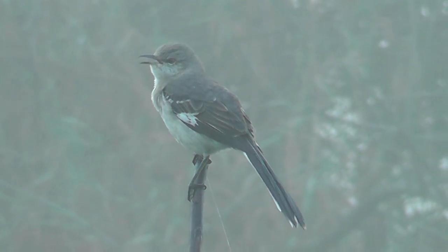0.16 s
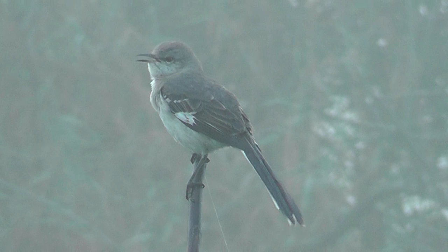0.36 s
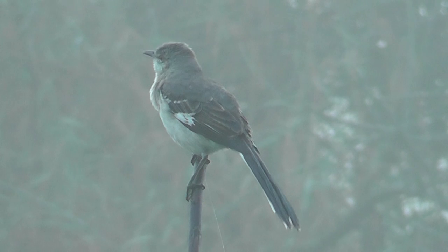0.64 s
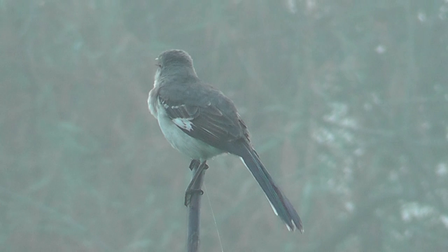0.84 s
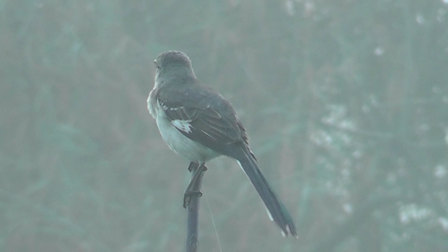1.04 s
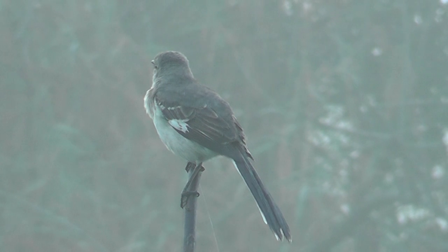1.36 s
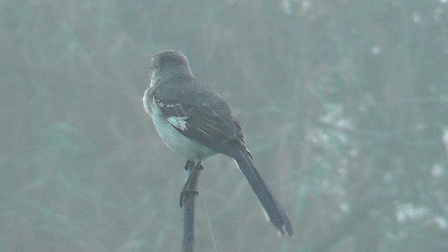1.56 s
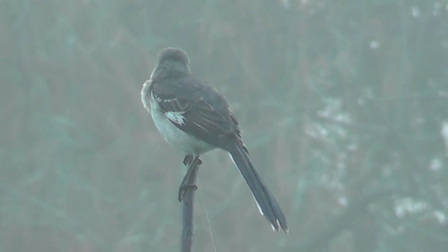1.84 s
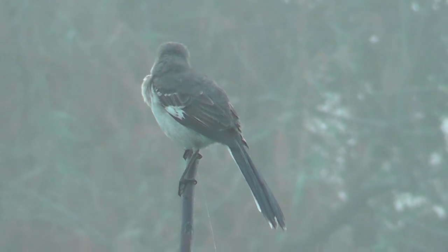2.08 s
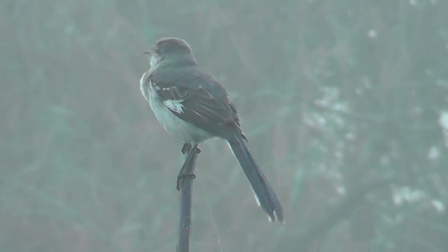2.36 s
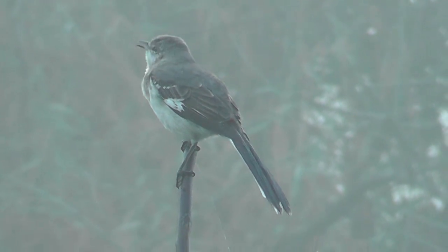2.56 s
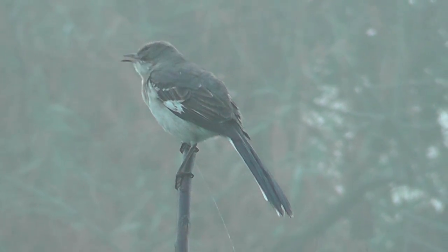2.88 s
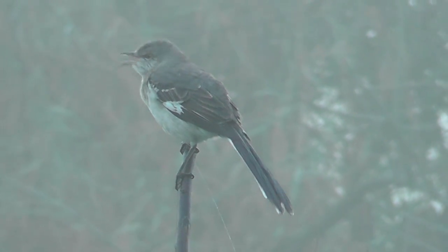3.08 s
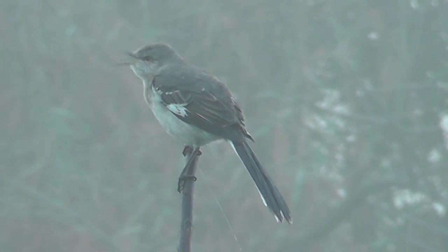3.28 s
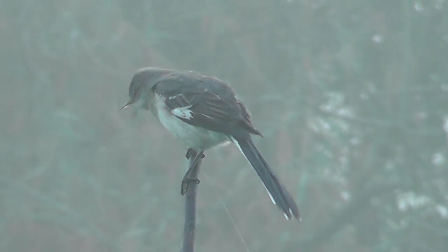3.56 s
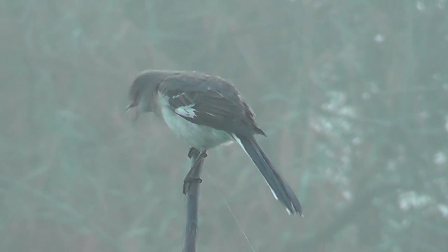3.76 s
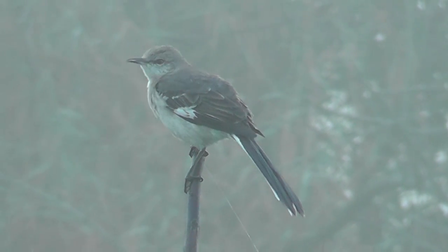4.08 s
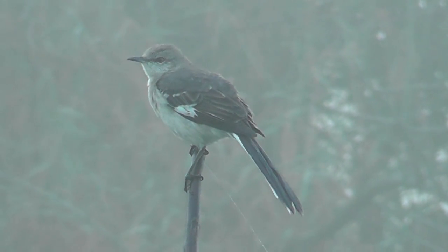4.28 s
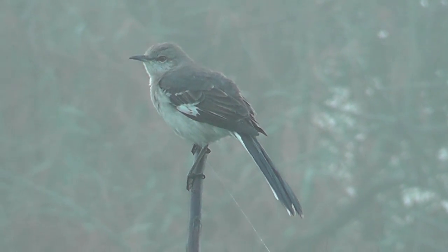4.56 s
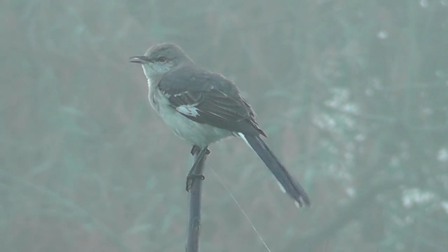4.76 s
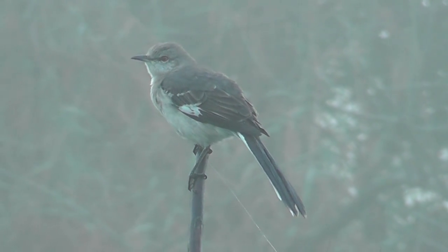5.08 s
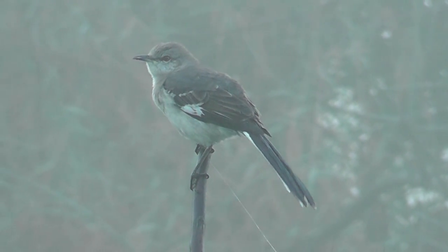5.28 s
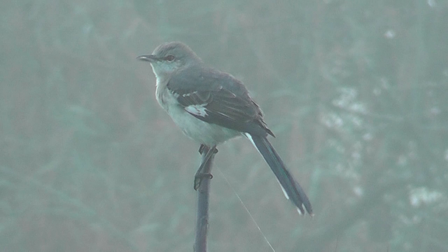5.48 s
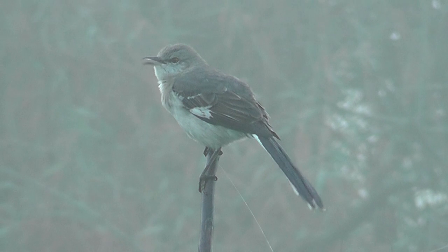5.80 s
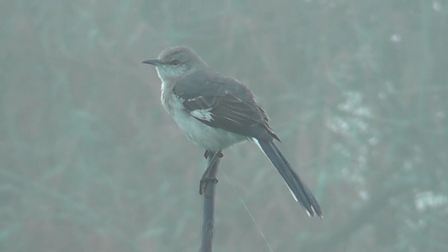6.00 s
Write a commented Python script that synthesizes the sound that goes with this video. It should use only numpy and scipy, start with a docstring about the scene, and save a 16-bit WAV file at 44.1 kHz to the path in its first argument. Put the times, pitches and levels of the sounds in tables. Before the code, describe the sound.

Varied bird whistles and falling slides give way to four raspy calls outdoors, with steady insects and a far traffic rush behind.

```python
"""A songbird on a twig whistles glides and warbles, then gives harsh two-voiced chucks. One side of its
voice box makes the whistles; both sides sound together in the chucks. Other birds answer with nasal
mews, sharp chips, thin whistles and far hoarse chirps. A cricket trills with its wings over an insect
chorus and the steady rush of distant traffic. Leaves scatter every bird call, and a camera's limiter
holds down the loudest peaks."""
import sys
import numpy as np
from scipy import signal
from scipy.fft import rfft, irfft, next_fast_len
from scipy.io import wavfile
from scipy.ndimage import uniform_filter1d, minimum_filter1d, map_coordinates

SR = 44100
rng = np.random.default_rng(int(sys.argv[2]) if len(sys.argv) > 2 else 0)


def wav_out(sig):
    """Save sig, one row per channel (or a flat mono array), as 16-bit PCM at SR to the path in sys.argv[1]."""
    wavfile.write(sys.argv[1], SR, np.round(np.clip(np.atleast_2d(sig).T, -1, 1) * 32767).astype(np.int16))


N = 270774

# A held whistle and two falling warbles. Overtones lie at 2 and 3 times the pitch:
# (second overtone [dB], third overtone [dB], rows of (time [s], pitch [Hz], level [dB]))
WHISTLE_PHRASES = [ (-19, -35, [(0.136, 2200, -42), (0.14, 2440, -32), (0.147, 4000, -36),
                   (0.155, 3300, -30), (0.175, 3500, -27.5), (0.2, 3746, -22), (0.25, 3605, -25),
                   (0.28, 3785, -28.5), (0.304, 3500, -40)]), (-17, -29, [(0.452, 3290, -35),
                   (0.465, 3540, -18.5), (0.49, 2270, -24), (0.504, 3060, -19), (0.517, 2510, -30),
                   (0.529, 2785, -22.5), (0.545, 2390, -29.5), (0.558, 2385, -38)]),
                   (-15.5, -34.5, [(0.904, 3530.0, -39), (0.912, 3900, -29), (0.927, 3850, -24),
                   (0.958, 2940, -19), (0.97, 3354, -23), (0.982, 2680, -25.5), (1.003, 2215, -27.5),
                   (1.019, 2600.0, -35.5), (1.05, 2190, -25), (1.081, 1974, -39.5), (1.108, 2200, -37)]), ]
# Downward slides, steepest after a bend: (start [s], bend [s], end [s], start pitch [Hz], bend pitch [Hz],
# end pitch [Hz], level [dB], change at the end [dB], second overtone [dB], third overtone [dB])
SLIDES = [(1.663, 1.68, 1.735, 4700, 4200, 2400, -23, -27, -22, -48),
          (2.503, 2.518, 2.562, 4800, 4470, 2740, -19, -14, -17.5, -48),
          (3.098, 3.126, 3.167, 4900, 4400, 3120, -27, -20, -11, -26)]
# Arched notes after a slide: (start [s], length [s], from [Hz], top [Hz], to [Hz], level [dB])
HOOKS = [(1.743, 0.062, 2490, 2550, 2180, -26.5), (2.602, 0.048, 2050, 2643, 2140, -25)]
# Harsh calls; the lower voice joins at the snap: (snap [s], run-up [s], hold [s], release [s], sag [s],
# upper from [Hz], upper to [Hz], lower enters [Hz], lower settles [Hz], lower to [Hz], quiver size [Hz],
# quiver period [s], quiver decay [s], level [dB], roughness [factor])
CHUCKS = [(4.86, 0.00092, 0.025, 0.029, 0.039, 4190, 3270, 3894, 3133, 2630, 1010, 0.0095, 0.0098, -25.5, 1),
          (5.319, .003, 0.035, 0.016, .042, 4050, 2960, 3800, 3315, 2730, 1000, .0113, 0.033, -22.5, 0.79),
          (5.638, 0.00101, 0.027, 0.029, .064, 3930, 2670, 2060, 3174, 1990, 550, 0.00985, 0.011, -21, 0.68),
          (5.901, .016, 0.046, 0.012, 0.063, 4220, 2590, 2800, 3013, 2245, 887, 0.018, 0.0094, -21, 0.45)]
# How the beak colours the harsh part of a chuck: (frequency [Hz], gain [dB])
BEAK = [(400, -90), (1800, -34), (3000, 11.0), (5500, 5.5), (8000, 2.5), (11500, -14.0), (13500, -15)]
# Nasal calls: (start [s], scoop ends [s], top [s], end [s], lower voice at top [Hz],
# upper voice at top [Hz], droop [factor], level [dB])
MEWS = [(0.304, 0.37, .49, 0.56, 2750, 4410, 0.96, -46),
        (1.848, 1.94, 2.056, 2.108, 2730, 4430, 1.4, -45.5),
        (3.586, 3.635, 3.77, 3.855, 2680, 4300, 1.05, -46),
        (5.037, 5.075, 5.3, 5.32, 2774, 4440, .1, -46.5)]
# Start and end of a mew's opening scoop: (lower voice [Hz], upper voice [Hz], level change [dB])
MEW_SCOOP = [(2423, 3930, -7), (2607, 4240, -2)]
# Tones mixed from a mew's two pitches: (lower pitch [multiple], upper pitch [multiple])
MEW_TONES = [(1, 0), (-2, 2), (0, 1), (2, 0), (-1, 2), (1, 1), (3, 0)]
# Strength of each of those tones through the mew: (start [dB], middle [dB], end [dB])
MEW_TONE_LEVELS = [(-4, -1, -3), (-10, -12.5, -11), (-6.5, -5, -5), (-5, 0, 3), (4.5, -3, -2),
                   (-14, -17, -16), (-13, -17, -20)]
# Sharp chips: (time [s], level [dB], pitch near the top [Hz])
CHIPS = [(0.839, -31, 5650), (1.5125, -32.5, 5350), (1.757, -28, 5540), (2.6204, -26, 5600),
         (2.9713, -30, 5600), (3.229, -19, 6210), (4.0685, -23.5, 5520), (5.5243, -26.5, 5660)]
# Thin whistles: (start [s], end [s], from [Hz], to [Hz], level [dB])
THIN_WHISTLES = [(0.795, 0.845, 5200, 5170, -49.5), (.815, 1.06, 5930, 5980, -46.5),
                 (0.83, 0.916, 7650, 7680, -52)]
# Far hoarse chirps: (start [s], level [dB])
FAR_CHIRPS = [(0, -46.5), (0.289, -43.5), (0.705, -46), (1.329, -48.5), (2.08, -47), (2.455, -44),
              (3.17, -47), (3.433, -45), (3.734, -49.5), (3.949, -50.5), (4.093, -48), (4.409, -46),
              (4.805, -48), (6.111, -45.5)]
# Echo from the leaves: (frequency [Hz], time to fade by 60 dB [s])
LEAF_DECAY = [(2000, 0.23), (4500, 0.15), (9000, 0.21)]
# Rush of distant traffic: (frequency [Hz], relative level [dB])
TRAFFIC_SPECTRUM = [(59, -85), (100, -60.5), (290, -21), (346, -10.5), (460, -8.5), (647, -0.5),
                    (1530, -15.5), (1800, -21.5), (2600, -22), (3380, -24.5), (5720, -120)]
# Insect chorus and hiss: (frequency [Hz], relative level [dB])
INSECT_SPECTRUM = [(1500, -35), (2200, -11), (2700, -51), (3700, -15), (4600, -16.5), (5450, -19.5),
                   (6050, -8.5), (6650, -5), (6950, -13.5), (7250, -20.5), (10000, -24.5), (13500, -23),
                   (16000, -27)]
# How alike the background noise is on both sides: (frequency [Hz], likeness [0 to 1])
STEREO_LIKENESS = [(300, 0.76), (700, 0.89), (1400, 0.11), (3000, 0.76), (6600, 1), (8000, 0.68),
                   (15000, 0.28)]
# How the songbird reaches the two microphones: (frequency [Hz], left over right [dB], left lead [rad])
SINGER_STEREO = [(2200, 1.5, -0.13), (2420, -1, -0.53), (3500, -3.5, 0.48), (4500, 2, 0.15),
                 (5600, -0.5, 0.2)]
# How the background reaches them: (frequency [Hz], left over right [dB], left lead [rad])
BACKGROUND_STEREO = [(256, -6, 0.24), (464, -3, 0.84), (1100, 2, 0.77), (2200, 0.6, 0.14)]


def whistles():
    """One side of the voice box makes a near-pure tone; the windpipe passes overtones above about 6 kHz."""
    pure, bright = np.zeros(N), np.zeros(N)
    for second_db, third_db, rows in WHISTLE_PHRASES + [trill_note(), *slide_notes(), *hook_notes()]:
        start, edge, (hz, db) = call_curves(rows)
        t = (start + np.arange(len(hz))) / SR
        hoarse_start = (t > .146) & (t < .172)
        angle = phase(hz, rough=np.where(hoarse_start, .055, .006))
        loudness = edge * amp(db + 0.84 * wobble(135, len(hz)))
        add(pure, start, loudness * np.sin(angle))
        glide_hz_per_s = np.abs(np.gradient(hz)) * SR
        rasp = .1 + .45 * np.clip(glide_hz_per_s / 40000, 0, 1)  # fast glides turn raspy
        overtones = amp(second_db) * np.sin(2 * angle)
        overtones += amp(third_db) * (np.sin(3 * angle) + 0.28 * np.sin(4 * angle))
        flutter = amp(1.7 * wobble(235, len(hz))) + rasp * wobble(1800, len(hz))
        add(bright, start, loudness * overtones * flutter)
    return pure + filtered(bright, lambda hz: 1 / (1 + (6300 / (hz + 1)) ** 12))


def trill_note():
    """Four fading swings between a quiet high note and a louder low note that sinks."""
    start_s, beat_s, high_hz, low_hz = .571, .0325, 2640, 2255
    second_db, third_db = -32, -43
    beats = np.arange(9) / 2
    is_high = beats % 1 == 0
    hz = np.where(is_high, high_hz, low_hz - 51.3 * beats)
    db = -27 - 11.5 * is_high - 2 * beats
    return second_db, third_db, np.c_[start_s + beats * beat_s, hz, db]


def slide_notes():
    """Each slide swells, drops steeply in pitch while loud, then trails off."""
    for start, bend, end, from_hz, bend_hz, to_hz, db, end_db, second_db, third_db in SLIDES:
        steep_s, steep_hz = .55 * (end - bend), .7 * (to_hz - bend_hz)
        yield second_db, third_db, [
            (start, from_hz, db - 20), (bend, bend_hz, db - 3),
            (bend + .2 * steep_s, bend_hz + .2 * steep_hz, db),
            (bend + steep_s, bend_hz + steep_hz, db), (end, to_hz, db + end_db)]


def hook_notes():
    """Each hook rises and falls, loudest at its top."""
    second_db, third_db, ends_db = -30, -26, -14.5
    for start, length, from_hz, top_hz, to_hz, db in HOOKS:
        yield second_db, third_db, [(start, from_hz, db + ends_db), (start + .335 * length, top_hz, db),
                                    (start + length, to_hz, db + ends_db)]


def chucks():
    """Both sides of the voice box sound; their shared airflow adds extra tones and a fading rasp."""
    voices, harsh = np.zeros(N), np.zeros(N)
    for *shape, roughness in CHUCKS:
        start, edge, (upper_hz, lower_hz, db, joined) = call_curves(chuck_shape(*shape))
        size = len(db)
        upper = np.sin(phase(upper_hz, rough=.032 * roughness))
        lower = joined * np.sin(phase(lower_hz, rough=.032 * roughness))
        flow = upper + 0.47 * lower
        air_fade = joined * amp(-300 * np.cumsum(joined) / SR)
        rasp = .9 * roughness * (1 + 0.82 * flow) * rng.standard_normal(size) * air_fade
        loudness = edge * amp(db + 1.5 * wobble(300, size))
        add(voices, start, loudness * (upper + amp(-5.5 + 2.5 * wobble(150, size)) * lower))
        add(harsh, start, edge * amp(db) * (0.23 * flow ** 2 + .12 * flow ** 3 + rasp))
    return voices + filtered(harsh, lambda hz: amp(look_up(BEAK, hz)))


def chuck_shape(snap, run_up, hold, release, sag_s, from_hz, to_hz, enter_hz, settle_hz, lower_end_hz,
                quiver_hz, period_s, decay_s, level_db):
    """The upper voice runs up alone; the lower joins, then both sag while a quick quiver dies away."""
    t = np.linspace(-run_up, hold + release, num=80)
    after = np.clip(t, 0, None)
    sag = np.sin(np.pi / 2 * np.clip(after / sag_s, 0, 1)) ** 2
    quiver = quiver_hz * np.cos(2 * np.pi * after / period_s) * np.exp(-after / decay_s)
    rise = 1 - .5 * np.sin(np.pi / 2 * (after - t) / run_up) ** 2
    upper_hz = rise * (from_hz + sag * (to_hz - from_hz) + quiver)
    settling = (enter_hz - settle_hz) * np.exp(-(after / .0071) ** 2)
    lower_hz = settle_hz + settling + sag * (lower_end_hz - settle_hz) + .68 * quiver
    swell_db = np.interp(t, [-run_up, 0, .012, hold, hold + release], [-18, -5, 0, -8.5, -30])
    db = level_db + 3.5 * quiver / 1000 + swell_db  # louder on the high side of the quiver
    joined = t > -.0015
    return np.c_[snap + t, upper_hz, lower_hz, db, joined]


def mews():
    """Two voices beat against each other and make a nasal stack of tones, with air noise riding on it."""
    out = np.zeros(N)
    for begin, scooped, top, end, lower_top, upper_top, droop, level_db in MEWS:
        rows = [(time, low, high, level_db + change_db)
                for time, (low, high, change_db) in zip((begin, scooped), MEW_SCOOP)]
        rows += [(top, lower_top, upper_top, level_db),
                 (end, lower_top - 190 * droop, upper_top - 450 * droop, level_db - 10 * droop)]
        start, edge, (lower_hz, upper_hz, db) = call_curves(rows)
        size = len(db)
        lower, upper = phase(lower_hz, rough=.011), phase(upper_hz, rough=.011)
        tones = np.zeros(size)
        for (times_lower, times_upper), levels in zip(MEW_TONES, MEW_TONE_LEVELS):
            tone_db = np.interp(np.linspace(0, 2, size), range(3), levels) + 3.2 * wobble(138.5, size)
            tones += amp(tone_db) * np.sin(times_lower * lower + times_upper * upper)
        air = 1 + amp(-9) * unit(wobble(1500, size))
        add(out, start, edge * amp(db) * tones * air)
    return out


def chips():
    """Each chip flicks up and down in 20 ms, shadowed by a softer, lower voice."""
    out = np.zeros(N)
    for time, level_db, top_hz in CHIPS:
        start, edge, (hz, db) = call_curves([
            (time - .006, .57 * top_hz, -24), (time - .0005, .92 * top_hz, -15),
            (time + .003, 1.01 * top_hz, -7), (time + .0062, .9 * top_hz, -14),
            (time + .014, .516 * top_hz, -26)])
        upper = np.sin(phase(hz, rough=.036))
        lower = amp(-7.5) * np.sin(phase(.87 * hz, rough=.092))
        add(out, start, edge * amp(level_db + db) * (upper + lower))
    return out


def thin_whistles():
    """Faint high notes that hold a nearly steady pitch."""
    out = np.zeros(N)
    for begin, end, from_hz, to_hz, level_db in THIN_WHISTLES:
        rows = [(begin, from_hz, -12), ((2 * begin + end) / 3, from_hz, 0), (end, to_hz, -9)]
        start, edge, (hz, db) = call_curves(rows)
        loudness = edge * amp(level_db + db + 3 * wobble(60, len(hz)))
        add(out, start, loudness * np.sin(phase(hz, rough=.011)))
    return out


def far_chirps():
    """Two trembling tones rise together into a hoarse chirp."""
    out = np.zeros(N)
    for time, level_db in FAR_CHIRPS:
        start, edge, (hz, db) = call_curves([
            (time, 2000, -6), (time + .019, 2550, -1), (time + .0398, 3100, -2), (time + .045, 2800, -9)])
        hoarse = sum(np.sin(phase(ratio * hz, rough=.12)) for ratio in (.86, 1.12))
        add(out, start, edge * amp(level_db + db) * hoarse)
    return out


def cricket():
    """Each stroke scrapes a ridged vein and rings a patch of wing; the pitch arches up and falls again."""
    strokes_per_s, top_hz = 43.71, 6780
    stroke = strokes_per_s * (np.arange(N) / SR + .0065) % 1
    arch = np.sin(np.pi * np.clip(stroke / .62, 0, 1))
    angle = phase(top_hz - 350 * (1 - arch) ** 2, rough=.007)
    scrape = unit(filtered(rng.standard_normal(N), lambda hz: np.exp(-((hz - 6500) / 380) ** 2)))
    loudness = amp(-44 + 0.73 * wobble(30, N) + wobble(2.4, N)) * arch ** 0.45
    return loudness * (0.22 * scrape + np.sin(angle) + 0.14 * np.sin(2 * angle))


def leaf_echo(sound):
    """Leaves scatter sound into echoes, each frequency dying at its own speed."""
    hz, t, noise = signal.stft(rng.standard_normal((2, SR // 2)), SR, nperseg=256)
    fade = amp(-60 * t / look_up(LEAF_DECAY, hz)[:, None])
    middle, side = signal.istft(noise * fade, SR, nperseg=256)[1]
    tail = middle + .5 * side * np.array([[1], [-1]])
    return signal.fftconvolve(sound[None], tail / np.linalg.norm(tail[0]), axes=1)[:, :N]


def distant_rush(spectrum, patchy_db):
    """Many far cars or insects blur into stereo noise with faint louder and softer patches."""
    noise = signal.stft(rng.standard_normal((2, N)), nperseg=512)[2]
    patches = uniform_filter1d(rng.standard_normal(noise.shape[1:]), size=6, axis=0)
    patches = uniform_filter1d(patches, size=14, axis=1)
    pair = signal.istft(noise * amp(patchy_db * unit(patches)), nperseg=512)[1][:, :N]

    def colour_and_width(hz):
        width = np.arccos(np.clip(look_up(STEREO_LIKENESS, hz), -1, 1)) / 2
        return amp(look_up(spectrum, hz)) * [np.cos(width), np.sin(width)]

    middle, side = filtered(pair, colour_and_width)
    return unit(np.array([middle + side, middle - side]))


def hum():
    """A faint tone swells and fades in the rush; a fainter, higher whine comes and goes."""
    hum_hz, whine_hz, loudest_at_s, swell_s = 517, 1500, 2.2, 1.5
    whine = amp(-62 + 3.5 * wobble(1.31, N)) * np.sin(phase(np.full(N, whine_hz), rough=.0033))
    swell_db = -7 * (1 - np.exp(-((np.arange(N) / SR - loudest_at_s) / swell_s) ** 2))
    loudness = amp(-47.5 + swell_db + 1.2 * wobble(2.46, N))
    hz = hum_hz + 2.54 * wobble(3, N)
    return whine + loudness * np.sin(2 * np.pi * np.cumsum(hz) / SR)


def two_microphones(sound, table):
    """Left and right pick up each pitch with unequal strength and timing."""
    table_hz, db, lead = np.transpose(table)

    def response(hz):
        strength = amp(look_up(np.c_[table_hz, db], hz))
        shift = np.exp(1j * look_up(np.c_[table_hz, lead], hz))
        return (strength * shift) ** np.array([[.5], [-.5]])  # half to each side

    return filtered(sound, response)


def call_curves(rows):
    """Turn a call's timed rows into its first sample, a quick fade in and out, and smooth curves."""
    times, *columns = np.transpose(rows)
    t = np.arange(times[0], times[-1], 1 / SR)
    edge = np.sqrt(2) * np.clip(np.minimum(t - times[0], times[-1] - t) / .0009, 0, 1)
    curves = [uniform_filter1d(np.interp(t, times, column), size=110) for column in columns]
    return round(times[0] * SR), edge, curves


def phase(hz, rough):
    """The running angle of a vibration whose pitch trembles by the fraction rough."""
    trembling_hz = hz * (1 + rough * wobble(700, len(hz)))
    return 2 * np.pi * (rng.random() + np.cumsum(trembling_hz) / SR)


def wobble(rate, size):
    """A smooth curve through rate random points a second."""
    points = rng.standard_normal(int(size * rate / SR) + 4)
    return map_coordinates(points, [np.arange(size) * rate / SR])


def filtered(sound, response):
    """Scale each frequency of a sound by response(hz)."""
    size = next_fast_len(N + 8192)
    return irfft(rfft(sound, size) * response(np.fft.rfftfreq(size, 1 / SR)), size)[..., :N]


def look_up(table, hz):
    """Read between (frequency, value) rows, with octaves evenly spaced."""
    table_hz, values = np.transpose(table)
    return np.interp(np.log(hz + 1), np.log(table_hz + 1), values)


def amp(db):
    """Turn decibels into a gain."""
    return 10 ** (np.asarray(db) / 20)


def unit(sound):
    """Scale to an average (rms) strength of 1."""
    return sound / np.sqrt(np.mean(sound ** 2) + 1e-20)


def add(track, start, sound):
    """Mix a sound into a track from sample start on."""
    part = track[start:start + len(sound)]
    part += sound[:len(part)]


def scene():
    """Mix the birds and their echoes with the cricket, traffic and insect chorus."""
    near, far, mew = chips() + thin_whistles(), far_chirps(), mews()
    notch = lambda hz: 1 - 1.02 / (1 + ((hz - 3060) / 70) ** 2)  # a reflection cancels one narrow band
    singer = filtered(whistles() + chucks(), notch)
    direct = two_microphones(singer, SINGER_STEREO) + near + mew + far * amp([[-1.5], [-3.5]]) + cricket()
    tree_echo = amp(-27) * np.pad(singer, (round(.12 * SR), 0))[:N]  # far trees answer late
    into_leaves = amp(-9) * singer + tree_echo + amp(-5) * near + amp(-9.5) * mew + amp(-3.5) * far
    echoes = amp(-9) * tree_echo + leaf_echo(into_leaves)
    drift = amp(.4 * wobble(1.5, N))
    traffic = amp(-39) * drift * distant_rush(TRAFFIC_SPECTRUM, patchy_db=0.25)
    insects = amp(-47) * distant_rush(INSECT_SPECTRUM, patchy_db=1.4)
    return direct + echoes + two_microphones(traffic + insects + hum(), BACKGROUND_STEREO)


def record(dry):
    """The camera turns down the loudest peaks and cuts the deep bass and the highest treble."""
    peak_limit, reaction_s, bass_hz, top_hz = .3, .004, 110, 15850
    span = round(reaction_s * SR)
    needed_gain = peak_limit / np.maximum(np.abs(dry).max(axis=0), peak_limit)
    gain = uniform_filter1d(minimum_filter1d(needed_gain, size=2 * span), size=span)
    return filtered(dry * gain, lambda hz: (hz < top_hz) * hz ** 2 / (hz ** 2 + bass_hz ** 2))


dry = scene()
out = record(dry)
wav_out(out)
```